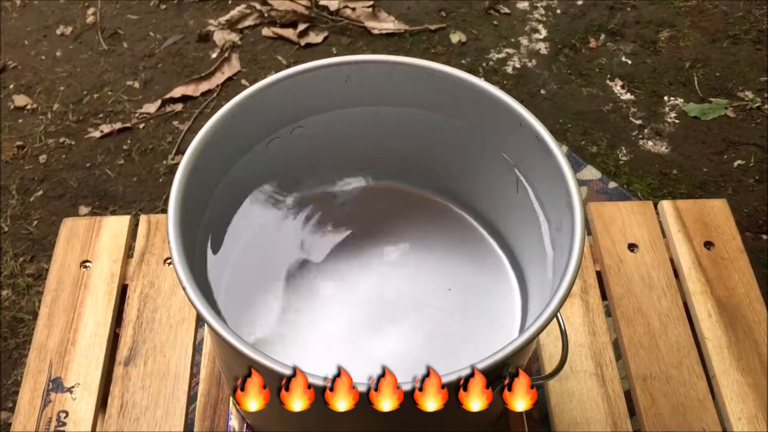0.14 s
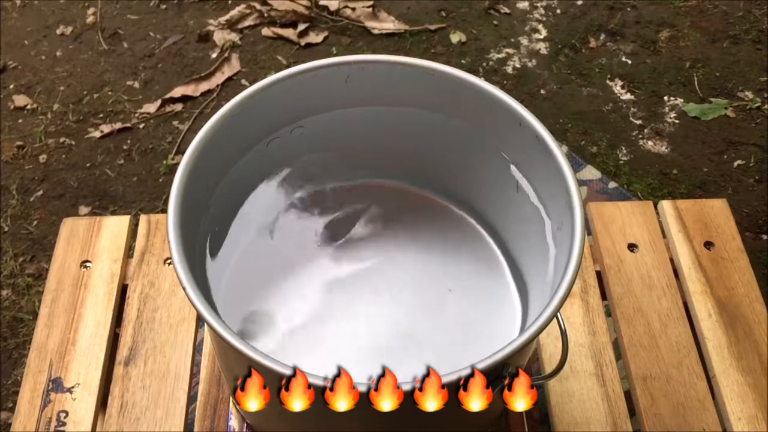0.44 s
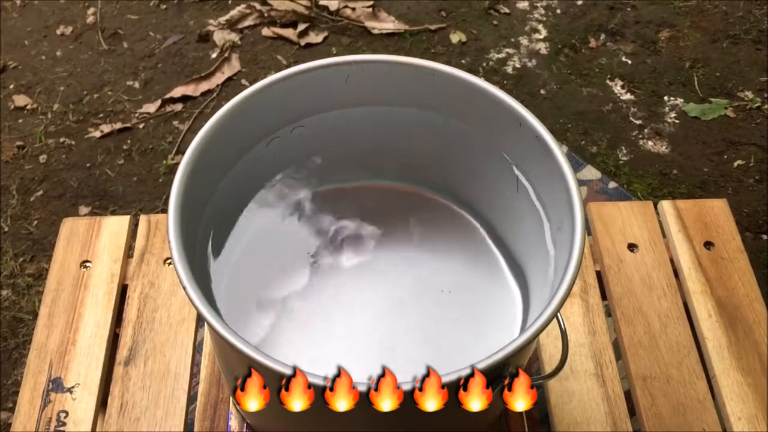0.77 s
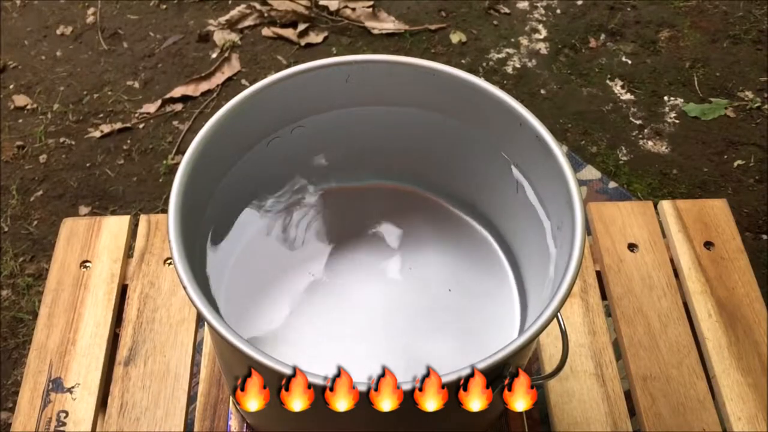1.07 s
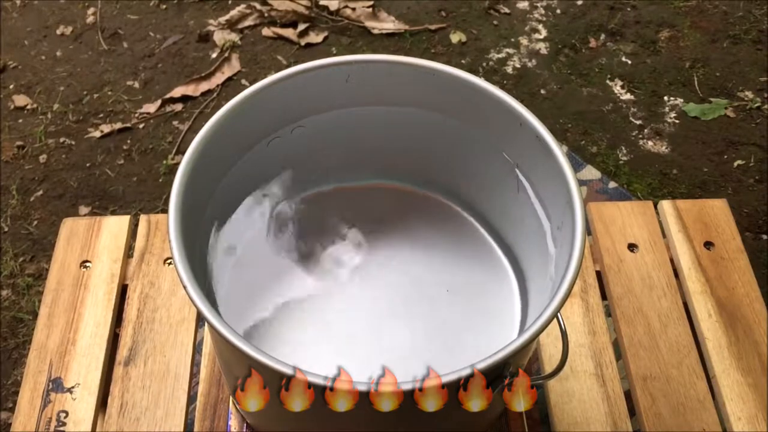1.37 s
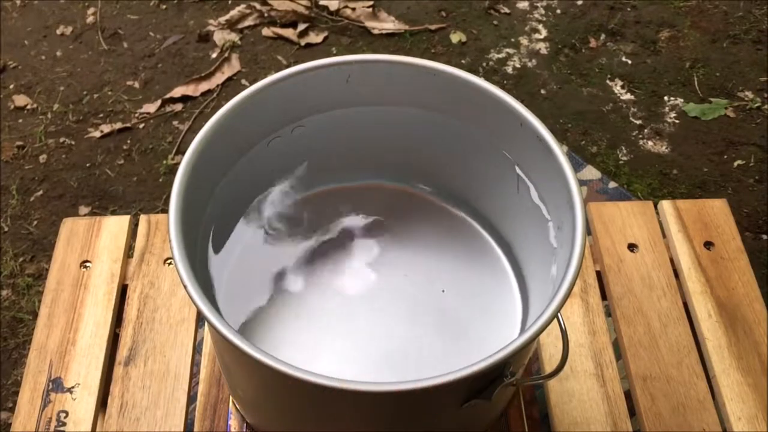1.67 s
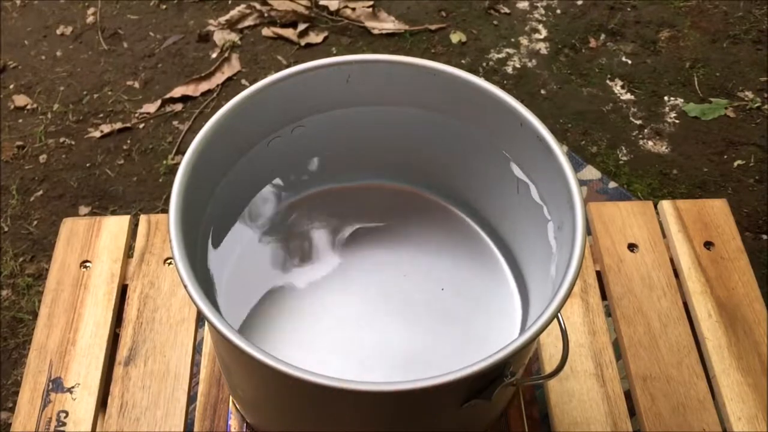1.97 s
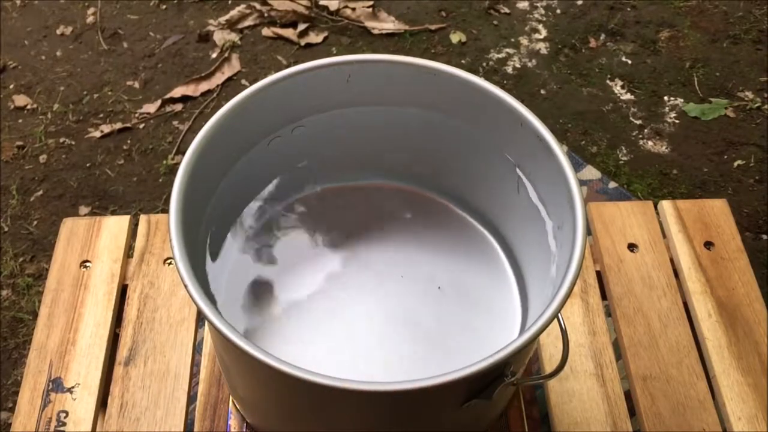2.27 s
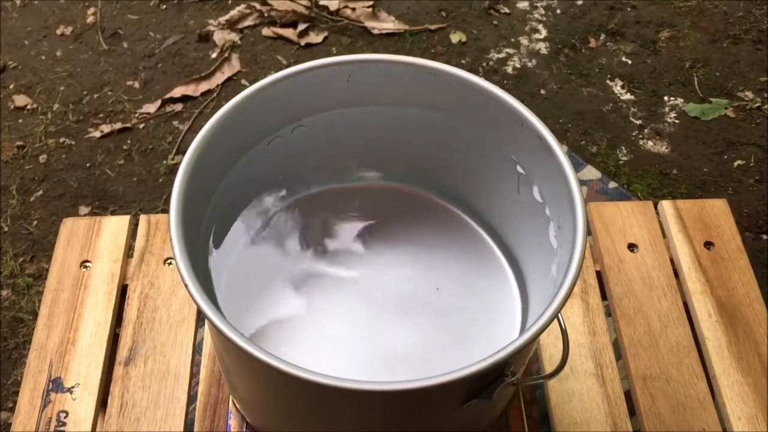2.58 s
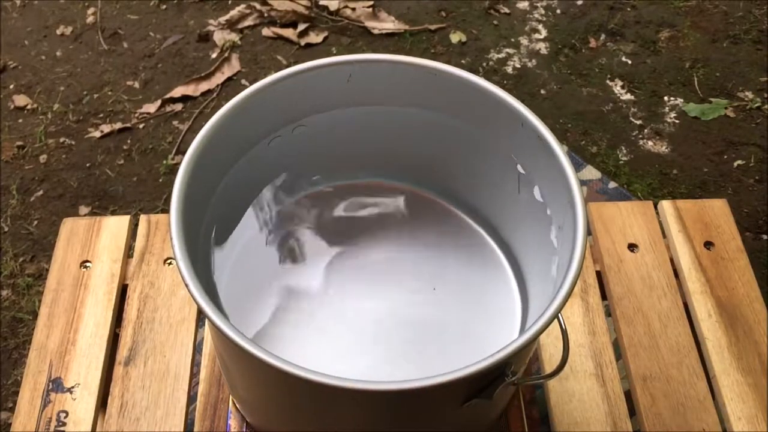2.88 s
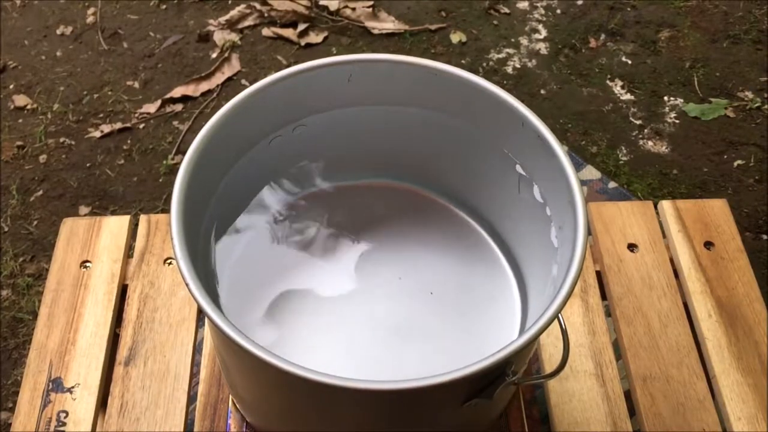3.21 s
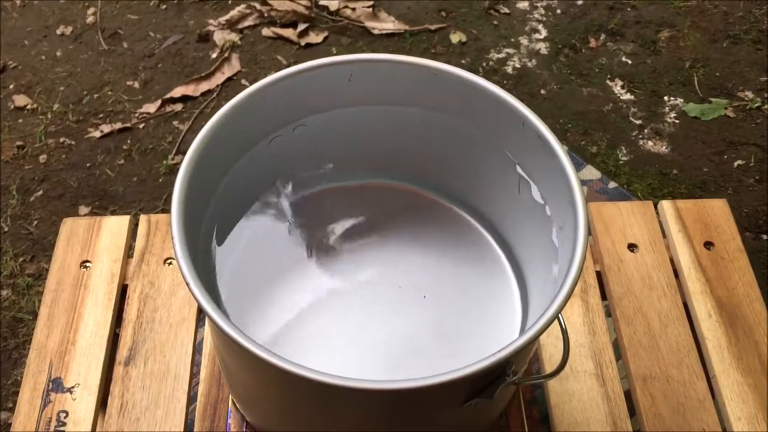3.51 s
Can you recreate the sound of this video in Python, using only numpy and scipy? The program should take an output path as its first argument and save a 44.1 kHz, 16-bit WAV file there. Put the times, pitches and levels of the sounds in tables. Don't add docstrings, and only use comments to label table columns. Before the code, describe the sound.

A gas burner under a metal pot starts as a faint hiss and low rumble; a sharp metallic clack comes early, then the flame grows into a steady roar. Outdoors, close microphone, no echo.

```python
import sys
import numpy as np
from scipy import signal
from scipy.io import wavfile
from scipy.ndimage import uniform_filter1d

SR = 44100
rng = np.random.default_rng(int(sys.argv[2]) if len(sys.argv) > 2 else 0)


def int16_out(signal):
    q = np.round(np.clip(np.atleast_2d(signal).T, -1, 1) * 32767)
    wavfile.write(sys.argv[1], SR, q.astype(np.int16))


def decibels_to_gain(level_db):
    exponent = np.asarray(level_db, float) / 20
    return 10 ** exponent


N = 160965


def evened(x):
    return x / np.sqrt(np.mean(x ** 2) + 1e-20)


def read(points, hz):
    point_hz, value = np.transpose(points)
    return np.interp(np.log(hz + 1), np.log(point_hz + 1), value)


def add(mix, start_s, sound):
    part = mix[round(start_s * SR):][:len(sound)]
    part += sound[:len(part)]


def unit_db(db):
    return db - 10 * np.log10(np.sum(decibels_to_gain(db) ** 2))


def smooth(x, bins, frames):
    return uniform_filter1d(uniform_filter1d(x, bins, 0), frames, 1)


def noise(level_field, size, patches):
    hop = size // 4
    frames = N // hop + 5
    hz = np.fft.rfftfreq(size, 1 / SR)
    real, imag, *seeds = rng.standard_normal((frames, len(hz), 2 + len(patches))).T
    drift_db = 0
    for seed, (db, bins, span) in zip(seeds, patches):
        drift_db = drift_db + db * evened(smooth(seed, bins, span))
    z = (real + 1j * imag) * decibels_to_gain(level_field(hz, np.arange(frames) * hop / SR) + drift_db)
    return np.sqrt(3 / 2) * signal.istft(z, nperseg=size, noverlap=size - hop)[1][:N]


# start_s, length_s, level_db, low_hz, high_hz
RUSTLES = [(.275, .03, -66, 10500, 15000), (0.947, .1, -51.5, 6500, 12600),
           (1.152, 0.013, -50, 8500, 15800), (2.202, 0.027, -43, 12000, 14800),
           (2.66, 0.1, -50, 8950, 14000)]


def fingers():
    out = np.zeros(N)
    for start_s, length_s, level_db, low_hz, high_hz in RUSTLES:
        n = round(length_s * SR)
        grit = rng.standard_normal(8000)[:n]
        band = signal.butter(2, [low_hz, high_hz], "band", fs=SR, output="sos")
        swell = np.sin(np.pi * (np.arange(n) / n) ** 0.49) ** 1.5
        add(out, start_s, decibels_to_gain(level_db) * signal.sosfilt(band, grit) * swell)
    return out


def ring(modes, t, phases):
    return sum(decibels_to_gain(db - 60 * t / t60_s) * np.sin(2 * np.pi * hz * t + phase)
               for (hz, db, t60_s), phase in zip(modes, phases))


# start_s, level_db, dullness (0-1)
CLACKS = [
    (.6385, -41, .35),
    (.6420, -38, .5),
    (.6459, -14, .05),
    (.6476, -17, .25),
    (.6492, -16, .55),
    (.6515, -13, .65),
    (.6553, -24, .55),
    (1.154, -38, .6),
]
# pitch_hz, level_db, t60_s
KNOB = [(298, -7.5, 0.027), (1160, -8, 0.037), (1397, -4, 0.028), (1930, -12, .022), (2440, -1.5, 0.0072),
        (2940, -19.5, 0.06), (3390, -8.5, 0.031), (4000, -5.5, 0.013), (5200, -8, 0.0085),
        (6260, -2.5, 0.008), (7960, -6.5, .012), (10960, 1, 0.004), (13500, -21, .01)]
# start_s, level_db
POT_HITS = [
    (.6482, -26),
    (.883, -53.5),
]
# pitch_hz, level_db, t60_s
POT = [(441, -4, .14), (506, -15, .15), (668, 0, .15), (560, -14, .06), (820, -13, .04), (1233, -23, .12),
       (1590, -12, .07)]


def valve():
    crack_db, crack_t60_s = -4.7, 0.043
    knob_attack_s, pot_attack_s = 0.000087, 0.0012
    out = np.zeros(N)
    t = np.arange(SR // 3) / SR
    grits = rng.standard_normal((len(CLACKS), len(t)))
    for (start_s, level_db, dull), grit in zip(CLACKS, grits):
        crack = decibels_to_gain(crack_db - 60 * t / crack_t60_s) * signal.lfilter([.25, .5, .25], [1], grit)
        clack = ring(KNOB, t, 3 * grit) + crack
        dull = np.clip(dull, 0, .99)
        clack = signal.lfilter([(1 - dull) ** 2], [1, -2 * dull, dull ** 2], clack)
        add(out, start_s, decibels_to_gain(level_db) * clack / 3 * np.minimum(t / knob_attack_s, 1))
    pot = ring(POT, t, np.zeros(len(POT))) * np.minimum(t / pot_attack_s, 1)
    for start_s, level_db in POT_HITS:
        add(out, start_s, decibels_to_gain(level_db) * pot)
    return out


# time_s, jet_db
FLOW = [(0.0, -61), (0.27, -58), (0.57, -55), (1.12, -53), (1.47, -50.5), (1.93, -48.5), (2.14, -46.5),
        (2.51, -44), (3.11, -43.5), (3.65, -43.5)]


def flow(t):
    low_db, high_db = -55.5, -43.5
    time_s, jet_db = np.transpose(FLOW)
    db = np.interp(t, time_s, jet_db)
    return db, np.clip((db - low_db) / (high_db - low_db), -.2, 1.2)


# pitch_hz, level_db
SMALL_ROAR = [(20, -51), (40, -28), (60, -4), (105, 2), (180, -7), (235, -9.5), (330, -21.5), (1100, -36)]
MID_ROAR = [(20, -38), (45, -19), (65, -3), (120, 2), (230, -9), (330, -18.5), (660, -16.5), (900, -35.5)]
BIG_ROAR = [(20, -67), (45, -54), (65, -5.5), (190, 3), (340, -12.5), (630, -6.5), (960, -16), (1120, -33)]


def roar():
    mid_size = 0.41

    def level_field(hz, t):
        top_db = -40 * np.log10(np.maximum(hz / 1120, 1))

        def colour(points, level_db):
            return unit_db(read(points, hz) + top_db)[:, None] + level_db

        small, mid, big = colour(SMALL_ROAR, -48.5), colour(MID_ROAR, -45.5), colour(BIG_ROAR, -38.5)
        size = flow(t)[1]
        early = np.minimum(size / mid_size, 1)
        late = np.maximum(size - mid_size, 0) / (1 - mid_size)
        return small + early * (mid - small) + late * (big - mid)

    return noise(level_field, size=2048, patches=[(1.92, 8, 4), (0.83, 3, 20)])


# pitch_hz, width_hz, depth_db
DIPS = [(2736, 92, -17), (3740, 100, -2.5), (4790, 220, -11.5), (7130, 120, -6), (9300, 75, -20),
        (10370, 380, -12.5), (12600, 120, -9)]


def jet_colour(hz, peaks, bed, dip_share):
    power = decibels_to_gain(read(bed, hz)) ** 2
    for peak_hz, width_hz, db in peaks:
        power = power + decibels_to_gain(db) ** 2 / (1 + (2 * (hz - peak_hz) / width_hz) ** 2) ** 2
    dips_db = dip_share * sum(db * np.exp(-((hz - dip_hz) / width_hz) ** 2) for dip_hz, width_hz, db in DIPS)
    return unit_db(10 * np.log10(power) + dips_db - 30 * (hz < 800))[:, None]


# pitch_hz, width_hz, level_db
SMALL_PEAKS = [(2338, 198, -1), (3040, 230, -10.5), (3314, 86, -6.5), (3900, 45, -4.5), (4116, 93, -9),
               (4300, 110, -9.5), (5530, 160, -9), (6000, 140, -12), (5830, 140, -15), (6174, 126, -2.5),
               (7060, 130, -6), (8600, 400, -17), (11030, 350, -22.5), (12900, 400, -44)]
BIG_PEAKS = [(2362, 148, -1), (3156, 570, -7.5), (3396, 56, -12), (3910, 100, -2), (4094, 61, -0.5),
             (4750, 37, 3), (5286, 47, -6.5), (5800, 13, 3.5), (6307, 143, -5.5), (6590, 120, -13),
             (8620, 740, -12), (9970, 99, -15), (10960, 150, -17.5), (13200, 470, -24)]
# pitch_hz, level_db
SMALL_BED = [(900, -26.5), (1500, -25), (2100, -14), (4000, -18.5), (6500, -17), (7800, -26), (10000, -29),
             (15500, -30.5)]
BIG_BED = [(1100, -33.5), (1600, -20.5), (2100, -8.5), (3500, -11), (6000, -13.5), (7500, -21.5),
           (10000, -25), (15500, -31)]
# pitch_hz, width_hz, level_db, centre_s, spread_s
WHOOSH = [(5600, 740, 7, 2.11, 0.4), (13300, 1500, 6, 2.14, .4), (10900, 450, 6, 1.74, 0.26),
          (8530, 300, 3.5, 2.27, 0.25)]


def jet():
    def level_field(hz, t):
        db, size = flow(t)
        whoosh_db = sum(top_db * np.exp(-((hz[:, None] - mid_hz) / width_hz) ** 2 - ((t - centre_s) / spread_s) ** 2)
                        for mid_hz, width_hz, top_db, centre_s, spread_s in WHOOSH)
        small = jet_colour(hz, SMALL_PEAKS, SMALL_BED, dip_share=.4)
        big = jet_colour(hz, BIG_PEAKS, BIG_BED, dip_share=0.79)
        return db + whoosh_db + 0.13 + (1 - size) * small + size * big

    flutter_db = 0.63 * evened(uniform_filter1d(rng.standard_normal(N), 1500))
    return noise(level_field, size=2048, patches=[(1.2, 16, 6), (1.8, 17, 40)]) * decibels_to_gain(flutter_db)


def scene():
    return (fingers() + valve() + roar() + jet())[None]


def below(db, limit_db):
    return 1 / (1 + np.exp(np.minimum(db - limit_db, 50)))


# centre_s, length_s, threshold_db (re loudest hiss band), depth_db
THINNINGS = [(.321, .030, -12, -35), (.589, .013, -14, -15), (1.186, .013, -11, -17), (1.397, .013, -12, -17),
             (1.677, .012, -13, -14), (1.931, .012, -13, -14), (1.974, .013, -13, -14),
             (2.124, .013, -13, -13)]


def drop_bands(mic):
    hole_db, hole_depth_db, hole_low_hz = -10, -30, 8900
    hz, t, z = signal.stft(mic, SR, nperseg=512, noverlap=384)

    def level(frames, bins):
        power = uniform_filter1d(uniform_filter1d(abs(z) ** 2, frames, 1), bins, 0)
        return 10 * np.log10(abs(power) + 1e-16)

    quick_db = level(5, 2) - level(15, 3)[hz > 1500].max(0)
    thinned_db = 0
    for centre_s, length_s, threshold_db, depth_db in THINNINGS:
        gate = np.exp(-(2 * (t - centre_s) / length_s) ** 6)
        thinned_db = thinned_db + depth_db * gate * below(quick_db, threshold_db)
    contrast_db = level(21, 2) - level(21, 31)
    holes_db = hole_depth_db * below(2 * contrast_db, 2 * hole_db) * (hz[:, None] > hole_low_hz)
    return signal.istft(z * decibels_to_gain(np.minimum(thinned_db, holes_db)), SR, nperseg=512, noverlap=384)[1][:N]


def limit_band(x):
    edge_hz, transient_db, open_db = 15715, -58, -8
    low = signal.oaconvolve(x, signal.firwin(2047, edge_hz, window=("kaiser", 6), fs=SR), "same")
    top = x - low
    loud = uniform_filter1d(top ** 2, 100) > decibels_to_gain(transient_db) ** 2
    return low + decibels_to_gain(open_db) * top * uniform_filter1d(loud * 1., 200)


def band_limit(x):
    return signal.sosfilt(signal.butter(12, 16790, fs=SR, output="sos"), x)


def record(dry):
    low_cut = signal.butter(2, 38, "high", fs=SR, output="sos")
    mic = signal.sosfilt(low_cut, dry[0])
    mix = limit_band(drop_bands(mic))[None]
    return band_limit(mix)


dry = scene()
out = record(dry)
int16_out(out)
```